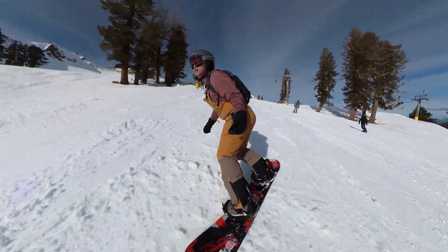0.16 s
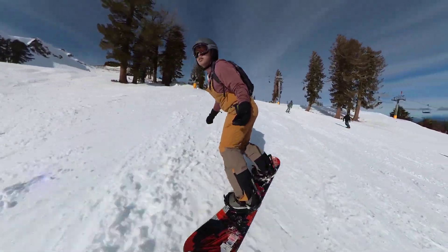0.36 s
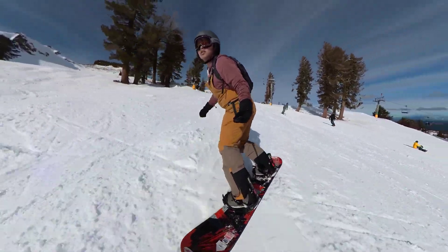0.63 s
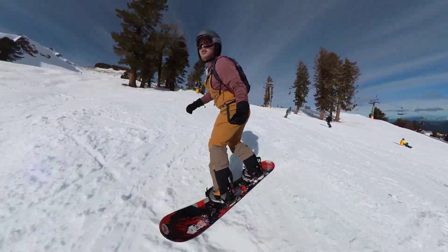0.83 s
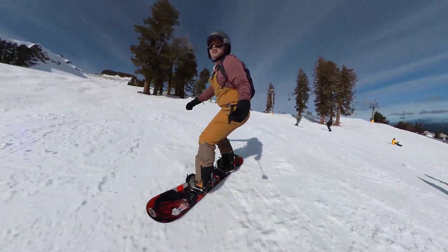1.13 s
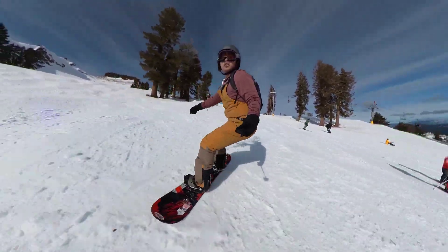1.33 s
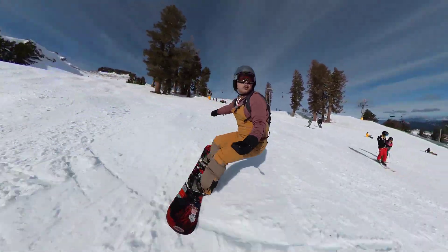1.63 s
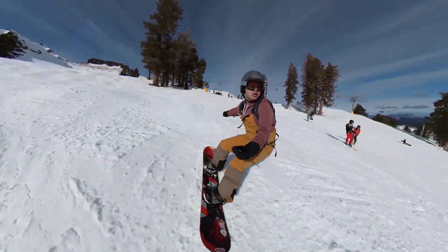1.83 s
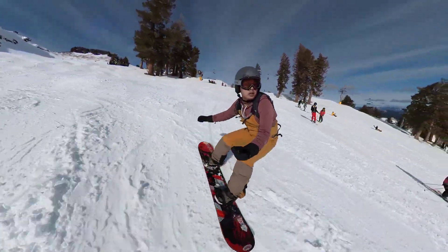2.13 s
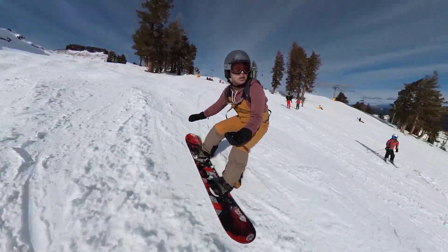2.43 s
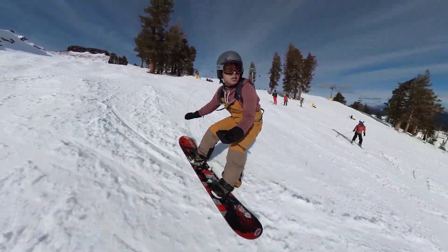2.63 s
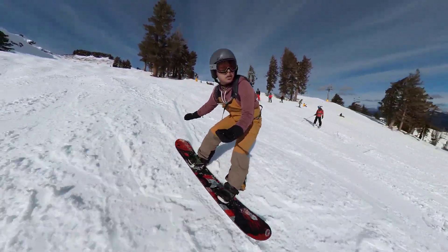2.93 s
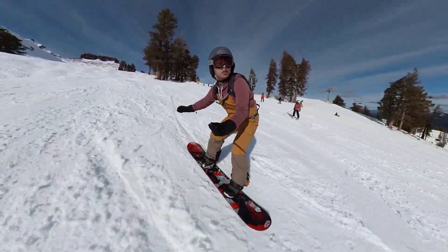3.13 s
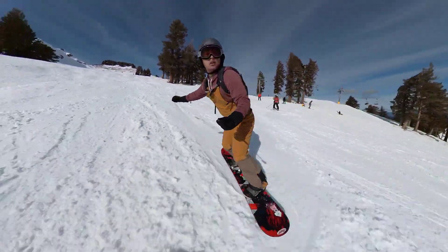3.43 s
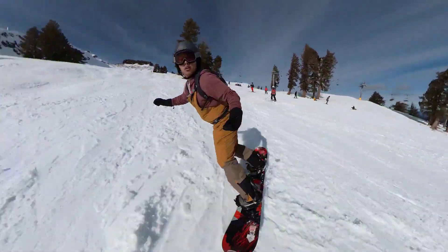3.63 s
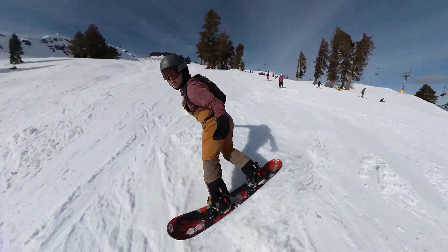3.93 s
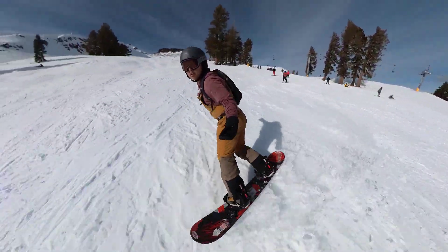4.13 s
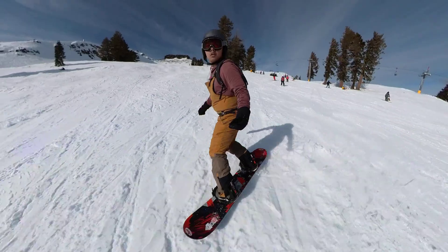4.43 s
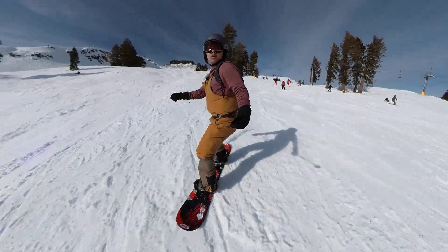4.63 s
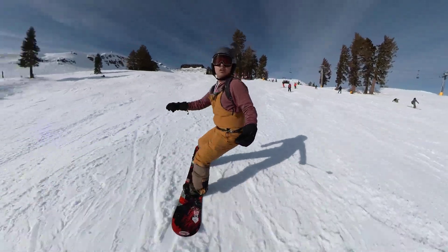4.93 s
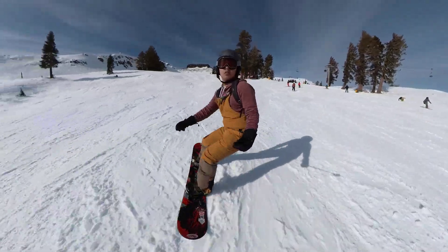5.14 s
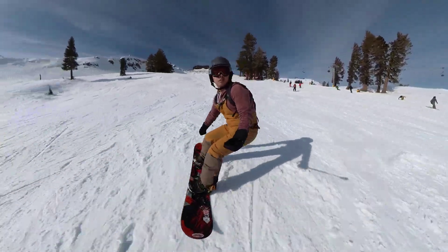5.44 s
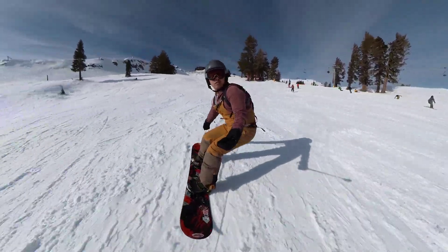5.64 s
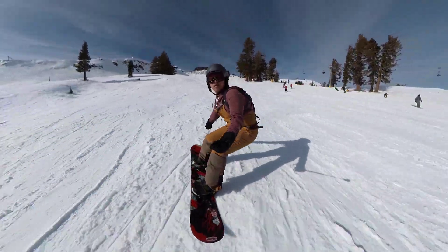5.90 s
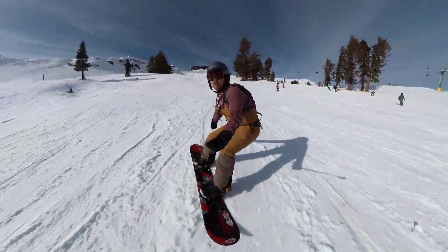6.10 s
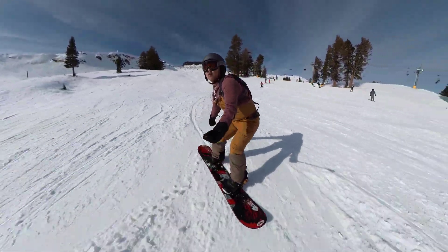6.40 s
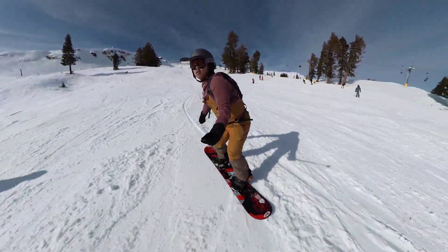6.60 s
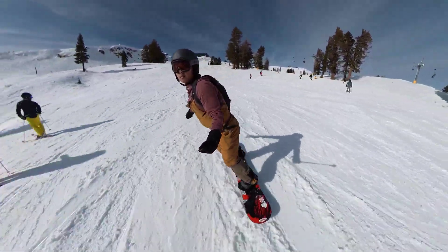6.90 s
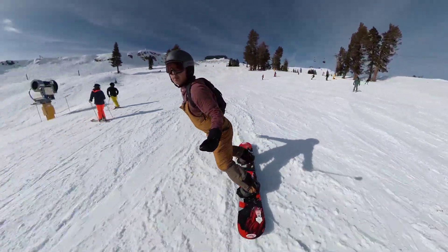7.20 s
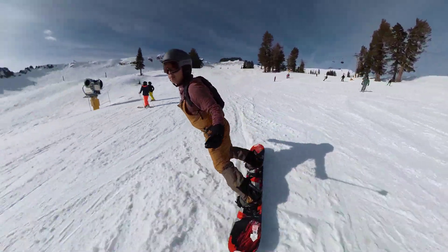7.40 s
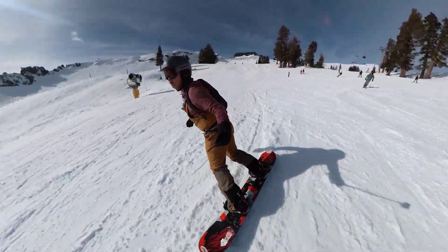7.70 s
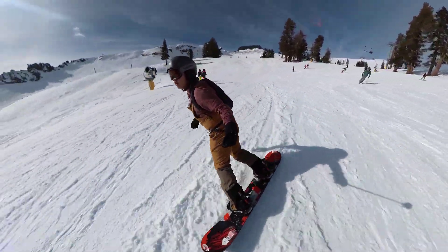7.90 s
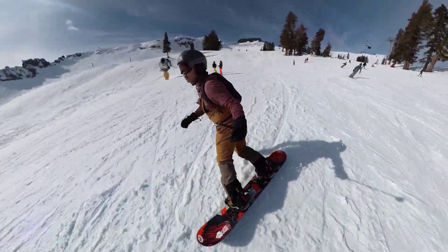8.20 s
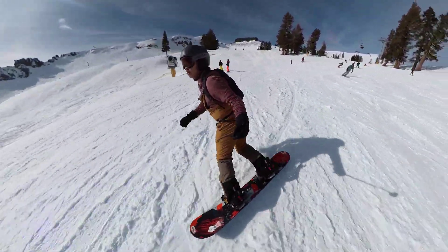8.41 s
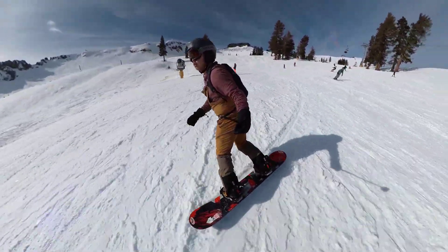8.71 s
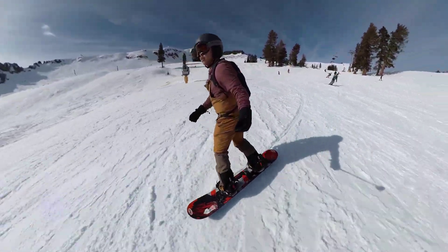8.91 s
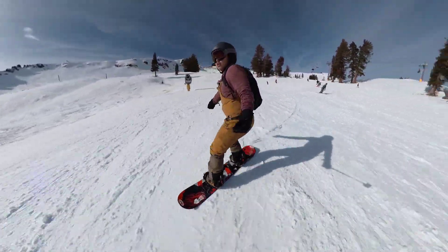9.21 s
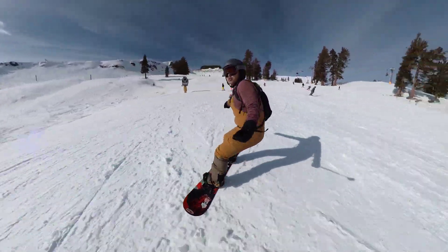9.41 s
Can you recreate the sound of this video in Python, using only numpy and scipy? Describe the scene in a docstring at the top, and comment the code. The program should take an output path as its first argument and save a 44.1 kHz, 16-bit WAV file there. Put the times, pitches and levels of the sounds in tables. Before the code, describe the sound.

A snowboard carves down a packed slope, heard from a microphone on a pole held by the rider. The edge scrapes and throws a bright hiss of spray that swells with each turn, over the low drumming of the board. After about two seconds, rough wind buffets the microphone, easing past the middle and returning in a later burst. Lumps of snow knock lightly, and a binding ticks near the end.

```python
"""A snowboard carves down packed snow, heard from a camera on a pole held by the rider.
The steel edge crushes grains and throws hissing spray with each turn; the board drums over ridges.
Loose lumps knock on the board, and a binding ticks near the end.
When the pole swings into the airstream, eddies buffet the microphone in rough gusts.
At times the camera switches to a sheltered microphone, where the hiss rings higher."""
import sys
import numpy as np
from scipy import signal
from scipy.fft import rfft, irfft, next_fast_len
from scipy.io import wavfile
from scipy.ndimage import map_coordinates

SR = 44100
rng = np.random.default_rng(int(sys.argv[2]) if len(sys.argv) > 2 else 0)


def dump(signal):
    """Clip the signal to [-1, 1] and save it as 16-bit WAV at the path in sys.argv[1]."""
    limited = np.clip(np.atleast_2d(signal).T, -1, 1)
    pcm = np.round(limited * 32767).astype(np.int16)
    wavfile.write(sys.argv[1], SR, pcm)


N = 421155
T = np.arange(N) / SR

# Turns load the edge. Each row: time of full load, hold, rise and release in seconds,
# scrape and hiss in dB, spray over hiss in dB.
TURNS = [(0, 0.35, .1, .1, -49, -32.5, -12), (0.348, 0.68, .012, 0.74, -47.5, -32, -4.5),
         (1.743, 0.58, 1, 0.51, -49, -52, -0.5), (2.463, 0.6, 0.12, 0.11, -53, -45, -4),
         (3.253, 1.5, 0.52, 0.57, -60.5, -47, -4), (3.986, 0.48, 0.015, 0.63, -44.5, -35.5, -4.5),
         (5.004, 0.42, 0.37, 0.39, -52.5, -41, -7), (5.698, 0.5, 1, 0.56, -46, -43.5, 0.5),
         (7.605, 1.25, 0.63, 0.43, -48, -41, -5), (9.204, 0.41, 1, .3, -63.5, -48.5, -5.5)]
# Short skids. Each row: time of full bite, hold, rise and release in seconds, scrape and hiss in dB.
SKIDS = [(0, 0.043, 0.015, .04, -41, -37), (0.357, 0.054, .012, 0.072, -47, -48),
         (0.462, 0.1, .03, .15, -44.5, -43), (0.603, 0.15, 0.095, .03, -48, -37.5),
         (0.81, 0.11, .04, 0.15, -43, -43), (1.245, 0.037, .03, .06, -53, -37.5),
         (1.439, 0.076, .015, 0.27, -53, -33.5), (1.695, .04, .015, .05, -47, -54),
         (1.755, 0.12, .03, 0.051, -44.5, -34.5), (2.107, 0.077, 0.055, 0.069, -45, -55),
         (2.578, 0.074, .025, .1, -46.5, -59), (3.088, 0.067, 0.026, .025, -47, -52),
         (3.8, 0.087, .05, 0.12, -48.5, -32), (4.041, 0.07, .03, .08, -44, -30),
         (4.333, .11, .05, .12, -51, -38.5), (4.799, 0.024, .01, .02, -45.5, -46),
         (5.032, 0.036, .02, 0.034, -48, -47), (5.106, 0.03, 0.016, 0.037, -50, -38.5),
         (5.225, 0.033, .02, .03, -47, -37), (5.349, .025, 0.022, 0.035, -45.5, -36.5),
         (5.56, 0.054, .05, .08, -47.5, -46), (5.985, 0.029, .02, 0.067, -45, -42),
         (6.3, 0.22, .1, 0.65, -55, -58), (6.945, 0.44, 0.042, .06, -56, -68),
         (7.552, 0.052, 0.011, .05, -48, -39.5), (7.789, 0.037, 0.043, .06, -45.5, -35.5),
         (7.895, 0.036, .03, .02, -52, -41), (8.075, 0.022, .02, 0.035, -47, -33.5),
         (8.398, .03, .03, .05, -45.5, -50), (9.2, .03, .02, .03, -56, -39)]
# Puffs of fine powder. Each row: centre and half length in seconds, level in dB.
POWDER_PUFFS = [(0.26, 0.14, -36.5), (.55, 0.088, -39), (1.05, 0.072, -38), (1.22, 0.077, -41),
                (2.0, 0.078, -44), (3.77, 0.06, -41), (4.1, .04, -39), (4.42, 0.073, -44),
                (5.135, 0.022, -41), (5.245, .02, -39), (5.38, .06, -44), (6.4, 0.11, -43),
                (6.8, 0.25, -52.5), (7.222, 0.12, -47), (8.742, .16, -43)]
# Sheets of spray. Each row: centre and half length in seconds, level in dB, pitch in Hz,
# glide in Hz per second.
SWISHES = [(0.606, 0.22, -31.5, 11650, -1500), (1.478, 0.04, -36.5, 10340, -7000),
           (1.819, 0.081, -37, 11300, -3000), (2.777, 0.023, -43, 12400, -5000),
           (2.882, 0.02, -47, 12400, -5000), (3.726, 0.034, -40, 13600, -6000),
           (3.839, 0.063, -34, 12700, -13000), (4.0, 0.01, -34.5, 9870, 5000),
           (4.187, 0.065, -33, 10880, 5000), (5.921, 0.24, -39.5, 11750, -1000),
           (7.459, 0.031, -45.5, 9530, 2000)]
# Stereo width of the spray. Each row: time in seconds, ratio of side to mid.
SPRAY_WIDTH = [(2.3, 0.56), (2.45, 0.17), (3.85, 0.23), (4.1, 0.2)]
# Weight taken off the board. Each row: centre and half length in seconds, dip in dB.
UNWEIGHTINGS = [(2, .04, -3), (4.74, 0.059, -5.5), (6.674, 0.19, -4)]
# Sheltered microphone in use. Each row: start and end in seconds.
SHELTERED_SPANS = [(.06, 0.353), (2.38, 3.975), (7.94, 9.7)]
# Spectra of the snow under the edge. Each row: frequency in Hz, gain in dB.
CRUNCH_SPECTRUM = [(600, -15), (1100, -3.5), (1500, 0.5), (2000, 3), (2900, 3), (3500, 1), (4500, -5.5),
                   (8000, -29)]
SCRAPE_SPECTRUM = [(1500, -30), (2900, -21.5), (3700, -3), (4500, -1.5), (5600, -0.5), (7300, -4),
                   (8600, -4), (10500, -1), (15000, -16)]
SIZZLE_SPECTRUM = [(6000, -27), (8000, -13.5), (9200, -6.5), (10000, -3.5), (10370, 0), (10900, -3),
                   (11500, -3), (12500, -26), (14500, -30)]
SPRAY_SPECTRUM = [(5000, -35), (6300, -10), (7300, -9), (8500, -13), (9900, -15), (11000, -1.5), (12000, 1),
                  (12800, 3), (13600, 0), (14600, -14), (16000, -31)]
POWDER_SPECTRUM = [(11500, -60), (13200, 2), (14000, -4), (15000, 3), (16000, -5)]
# Spectra of the board's vibration. Each row: frequency in Hz, gain in dB.
FLEX_SPECTRUM = [(25, -48), (45, -35), (70, -10.5), (95, -1), (112, -1.5), (135, -1), (165, -4), (220, -14),
                 (400, -18), (1000, -66)]
DECK_OPEN_SPECTRUM = [(110, -33), (210, -9.5), (310, -2.5), (410, -6.5), (560, 0), (680, -3.5), (850, -5),
                      (1100, -5), (1400, -19), (1600, -12.5), (4000, -22)]
DECK_SHELTERED_SPECTRUM = [(110, -37), (210, -5), (310, 5), (410, -2.5), (540, 3.5), (660, -0.5), (850, -5),
                           (1100, -7.5), (1600, -11), (4000, -25.5)]
HUM_SPECTRUM = [(60, -56), (95, -8), (109, 4), (116, 13), (130, -41), (200, -78)]
HOLLOW_SPECTRUM = [(650, -21), (950, -5), (1150, -4.5), (1400, -6), (1560, -21), (2500, -43)]
# The board's flexing drone, hum and hollow ring. Each row: time in seconds, level in dB.
FLEX_LEVELS = [(0, -53), (.38, -57.5), (.85, -57), (1.0, -65), (1.42, -60), (1.56, -52.5), (2.0, -56.5),
               (4.03, -44.5), (4.55, -44.5), (4.8, -55), (5.25, -51), (5.47, -39), (5.8, -55.5),
               (6.1, -48.5), (6.45, -55.5), (7.0, -53), (7.7, -48.5), (9.4, -41)]
HUM_LEVELS = [(7.9, -71), (8.1, -51), (8.55, -50), (8.85, -41), (9.17, -45), (9.3, -46), (9.55, -71)]
HOLLOW_LEVELS = [(0, -77), (.9, -52), (1.45, -58), (1.8, -50.5), (2.05, -69), (2.42, -51), (2.6, -56),
                 (2.8, -51), (3.05, -82), (3.3, -77), (4.8, -60), (6.0, -56.5), (6.6, -65), (9.55, -64)]
# Gusts. Each row: time of full strength, hold and rise in seconds, large-eddy level in dB, # tilt in dB per
# step down in eddy size. The brief row at 1.5 s is a dull knock on the board, voiced by the same eddy noise.
GUSTS = [(0, 0.35, .05, -50, -8), (1.5, 0.0071, 0.0062, -45, -6), (2.195, .1, 0.17, -47.5, -0.5),
         (2.296, 0.055, 0.11, -40, 1.5), (2.41, 0.17, 0.1, -34.5, -16), (2.64, 0.32, 0.08, -30.5, -14),
         (2.986, 0.13, 0.046, -38, -22), (3.13, 0.032, 0.043, -31, -11), (3.196, 0.54, 0.011, -27.5, -12.5),
         (3.785, 0.15, 0.025, -29.5, -14.5), (3.922, 0.018, 0.02, -33.5, -2.5),
         (4.017, 0.032, .02, -44, -12), (4.26, 0.09, 0.091, -37, -8), (4.295, 0.11, 0.02, -33.5, -13),
         (4.393, 0.03, 0.055, -42, -14), (5.118, 0.17, 0.045, -40, -14.5), (6.616, 0.29, 0.076, -48.5, -40),
         (6.921, 0.34, 0.079, -40.5, -19), (7.19, 0.059, 0.058, -41, -6.5),
         (7.272, 0.08, 0.065, -35.5, -10), (7.376, 0.14, .02, -32.5, -8.5), (7.527, 0.045, .03, -37.5, -6),
         (7.871, 0.037, 0.084, -39, -1)]
# Spectra of air at the microphone port. Each row: frequency in Hz, gain in dB.
LARGE_EDDY_SPECTRUM = [(22, -36), (40, -58), (62, -9), (100, 1.5), (140, 1), (200, -4), (270, -12),
                       (420, -42), (900, -32), (2000, -90)]
MIDDLE_EDDY_SPECTRUM = [(90, -31), (200, -1.5), (290, 2), (480, -2), (700, -8.5), (950, -15), (1500, -29),
                        (4000, -79)]
SMALL_EDDY_SPECTRUM = [(350, -4), (700, 2), (950, 2.5), (1300, -1.5), (1700, -9.5), (2400, -17.5),
                       (3500, -28), (6000, -43), (12000, -65)]
WHOOSH_SPECTRUM = [(250, -32), (450, -3.5), (750, 1), (1000, -1.5), (1300, -8), (1900, -17), (3000, -31.5),
                   (6000, -51)]
# Lumps and ice hitting the board. Each row: start in seconds, relative level in dB, pitch in Hz.
LUMPS = [(1.271, -40.5, 890), (1.502, -41, 427), (1.702, -37, 1080), (4.909, -42, 7050),
         (5.25, -37.5, 3220), (9.215, -42.5, 1320)]
# Slaps of air. Each row: start in seconds, peak before limiting in dB, weight of torn small eddies.
SLAPS = [(2.274, -19.5, 1), (2.309, -15.5, 1), (2.351, -19, 1), (2.368, -18, 0.97), (2.44, -19, .05),
         (2.52, -19, 0.14), (2.624, -27, .15), (2.639, -21.5, 0.15), (2.664, -25, .1), (2.675, -28, .1),
         (2.698, -24, .1), (2.723, -28, .1), (2.775, -18, 0.34), (2.8, -18.5, 0.15), (2.842, -18.5, 0.19),
         (2.866, -25, 0.089), (2.897, -20, 0.18), (2.949, -26.5, .15), (3.094, -23, .1),
         (3.128, -18.5, 0.12), (3.145, -23, .1), (3.197, -23.5, 0.3), (3.23, -26, .15), (3.246, -28, 0.14),
         (3.277, -26, .2), (3.286, -29, 0.14), (3.32, -21.5, 0.38), (3.346, -18.5, 0.55),
         (3.408, -19, 0.23), (3.467, -26, .15), (3.49, -21, 0.24), (3.509, -19, 0.18), (3.584, -26, .15),
         (3.605, -14.5, 0.25), (3.63, -18, 0.17), (3.645, -16, 0.25), (3.716, -19, 0.32), (3.779, -24, .2),
         (3.822, -23.5, .2), (3.862, -28, .2), (3.884, -20, .15), (4.232, -32, .3), (4.259, -19, 0.21),
         (4.293, -20, .15), (4.34, -30, 0.35), (4.363, -26.5, 0.18), (4.454, -29, 0.069),
         (4.473, -28.5, .05), (5.094, -32, .05), (5.109, -35, .02), (5.13, -39, .1), (5.141, -30.5, .15),
         (5.154, -33, .4), (5.164, -23.5, 0.1), (5.205, -27, .15), (5.219, -31, .3), (5.251, -23, 0.23),
         (7.237, -23.5, 0.4), (7.271, -23, 0.97), (7.284, -18.5, 1), (7.297, -30, .6), (7.314, -23, .5),
         (7.328, -29, .8), (7.358, -23, 1), (7.374, -17, 0.94), (7.396, -19, 0.99), (7.42, -24, 1),
         (7.436, -25, .2), (7.451, -23, 0.99), (7.476, -20, 0.45), (7.508, -18.5, .95), (7.522, -23, .6),
         (7.576, -33, 0.66), (9.086, -34.5, 0.97), (9.342, -29, .08), (9.538, -30.5, 0.94)]
# Head-on gusts. Each row: time of full strength, hold and rise in seconds, level in dB,
# nominal pitch in Hz, climb in octaves per second.
WHOOSHES = [(2.301, 0.0098, 0.12, -37, 940, 2), (2.327, 0.044, 0.065, -38, 1660, 1),
            (3.945, 0.025, 0.055, -26.5, 1149, 7), (7.286, .008, 0.032, -42, 1505, -0.5),
            (7.373, .028, .05, -41.5, 2200, 0), (7.865, 0.062, 0.1, -31, 729.6, 5.5)]
# Binding ticks. Each row: start in seconds, peak in dB.
BINDING_TICKS = [(9.477, -38), (9.482, -27)]
# Binding modes. Each row: frequency in Hz, gain in dB, time to fall 60 dB in seconds.
BINDING_MODES = [(1940, -9, .015), (2600, 3, 0.0088), (3320, -4, 0.022), (4000, -5, .02), (4530, 4, 0.015)]


def amp(db):
    """Decibels to gain."""
    return 10 ** (np.asarray(db) / 20)


def unit(x):
    """Scale to rms 1."""
    return x / np.sqrt(np.mean(x ** 2))


def power_sum(gains):
    """Unrelated sounds add in power."""
    return np.sqrt(sum(g ** 2 for g in gains))


def curve(points):
    """Straight lines through (seconds, value) points."""
    return np.interp(T, *np.transpose(points))


def swell(full_s, hold_s, rise_s, release_s):
    """Rise, hold, release; rise and release are times for a tenfold change."""
    return 10 ** -(np.maximum(full_s - T, 0) / rise_s + np.maximum(T - full_s - hold_s, 0) / release_s)


def bell(centre_s, half_s):
    """Gaussian swell."""
    return np.exp(-.5 * np.minimum(((T - centre_s) / half_s) ** 2, 200))


def burst(start_s, rise_s, decay_s):
    """A blow's sample span, age and envelope of peak 1."""
    first = int(start_s * SR)
    span = slice(first, min(N, first + SR // 10))
    age_s = T[span] - T[first]
    envelope = (1 - np.exp(-age_s / rise_s)) * np.exp(-age_s / decay_s)
    return span, age_s, envelope / envelope.max()


def walk(rate_hz):
    """Smooth random drift, standard deviation 1."""
    knots = rng.standard_normal(N // 16)
    steps = np.arange(0, T[-1] * rate_hz + 1, 1 / 4)
    drift = np.interp(T * rate_hz, steps, map_coordinates(knots, [steps], order=2, mode="wrap"))
    return drift / drift.std()


def colour(x, spectrum):
    """Filter by (Hz, dB) points."""
    hz, db = np.transpose(spectrum)
    size = next_fast_len(N + 4096, real=True)
    bins_hz = np.maximum(np.fft.rfftfreq(size, 1 / SR), 1)
    gain = amp(np.interp(np.log(bins_hz), np.log(hz), db))
    return irfft(rfft(x, size) * gain, size)[:N]


def noise(spectrum, drive=1):
    """Noise modulated by drive, then coloured; rms 1."""
    return unit(colour(rng.standard_normal(N) * drive, spectrum))


def butter(x, hz, kind, order):
    """Butterworth filter."""
    return signal.sosfilt(signal.butter(order, hz, kind, fs=SR, output="sos"), x)


def sheltered(fade_s=0.02):
    """Share of the sheltered microphone, 0 to 1."""
    return sum(np.clip(.5 + np.minimum(T - start_s, end_s - T) / fade_s, 0, 1)
               for start_s, end_s in SHELTERED_SPANS)


def mic_gain(open_db, sheltered_db):
    """A layer's gain at the microphone in use."""
    return amp(open_db + (sheltered_db - open_db) * sheltered())


def load():
    """Gain of the board's weight on the snow; dips between turns."""
    return amp(sum(db * bell(centre_s, half_s) for centre_s, half_s, db in UNWEIGHTINGS))


def carving():
    """Scrape, hiss and spray gains: the flat base gliding, plus turns and skids."""
    gains = [amp([[-57.5], [-55], [-71]])]  # steady glide
    for *timing_s, scrape_db, hiss_db, spray_db in TURNS:
        gains.append(amp([[scrape_db], [hiss_db], [hiss_db + spray_db]]) * swell(*timing_s))
    for *timing_s, scrape_db, hiss_db in SKIDS:
        gains.append(amp([[scrape_db], [hiss_db], [hiss_db - 14]]) * swell(*timing_s))
    return power_sum(gains)


def grains(spectrum, chatter, grain_db, rate_hz, width):
    """Tiny snow fractures ride on the edge's chatter; mid and side."""
    fractures = chatter * amp(grain_db * walk(rate_hz))
    return np.array([noise(spectrum, fractures), width * noise(spectrum, fractures)])


def band_flicker(x, patch_hz=330, patch_s=.024, depth_db=2.2):
    """Narrow bands of the hiss swell and fade at random."""
    hz, times_s, bands = signal.stft(x, SR, nperseg=512)
    knots = rng.standard_normal((SR // 100, N // 400))
    grid = np.meshgrid(hz / patch_hz, times_s / patch_s, indexing="ij")
    patches = unit(map_coordinates(knots, grid, order=2, mode="wrap"))
    return signal.istft(bands * unit(amp(depth_db * patches)), SR, nperseg=512)[1][:, :N]


def edge(scrape_gain, hiss_gain, spray_gain):
    """The edge chatters over ridges, breaks crust, scrapes, crushes grains and throws spray; stereo."""
    width = curve(SPRAY_WIDTH)
    puffs = [amp(db) * bell(centre_s, half_s) for centre_s, half_s, db in POWDER_PUFFS]
    chatter = amp(0.85 * walk(24) + 0.71 * walk(110) + 0.45 * walk(1300))
    crunch = grains(CRUNCH_SPECTRUM, chatter, grain_db=0.04, rate_hz=280, width=0.016)
    scrape = grains(SCRAPE_SPECTRUM, chatter, grain_db=0.5, rate_hz=720, width=0.76)
    sizzle = grains(SIZZLE_SPECTRUM, chatter, grain_db=-0.8, rate_hz=340, width=0.18)
    spray = grains(SPRAY_SPECTRUM, chatter, grain_db=0, rate_hz=150, width=width)
    powder = grains(POWDER_SPECTRUM, chatter, grain_db=1, rate_hz=370, width=2.1 * width)
    crunch *= scrape_gain * load() * mic_gain(open_db=-4, sheltered_db=-5.5)
    scrape *= scrape_gain * mic_gain(0.24, -2.5)
    sizzle *= hiss_gain * mic_gain(-3, -13)
    spray *= spray_gain * mic_gain(-0.7, 4)
    powder *= power_sum([spray_gain * mic_gain(-3, -2)] + puffs)
    mid, side = band_flicker(crunch + scrape + sizzle + spray + powder + swishes(chatter))
    mid = butter(mid, 70, "highpass", order=2)
    side = butter(side, 3000, "highpass", order=14)  # only the treble spreads
    return np.array([mid + side, mid - side])


def board(scrape_gain, pivot_db=-49, growth_db_per_db=0.64):
    """Bumps flex the board; the deck rattles more as the edge scrapes harder; a hum joins late."""
    flex_gain, hum_gain = amp(curve(FLEX_LEVELS)), amp(curve(HUM_LEVELS))
    bumps = walk(35)
    hum = noise(HUM_SPECTRUM) * hum_gain
    rattle_gain = amp(pivot_db) * (scrape_gain / amp(pivot_db)) ** growth_db_per_db
    share, jolts = sheltered(), amp(bumps)
    deck_open = amp(-3.5) * noise(DECK_OPEN_SPECTRUM, jolts)
    deck_sheltered = amp(-0.5) * noise(DECK_SHELTERED_SPECTRUM, jolts)
    deck = rattle_gain * ((1 - share) * deck_open + share * deck_sheltered)
    # the hum draws its energy from the drone
    drone_gain = np.sqrt(np.maximum(flex_gain ** 2 - hum_gain ** 2, 0.46 * flex_gain ** 2))
    drone = noise(FLEX_SPECTRUM, amp(2 * bumps + 1.7 * walk(9))) * drone_gain
    return drone + hum + deck * load()


def hollow_ring():
    """The sliding board rings in one broad band."""
    return noise(HOLLOW_SPECTRUM) * amp(curve(HOLLOW_LEVELS)) * load()


def gusts(release_s=0.042, middle_db=5.5):
    """Gains of large, middle and small eddies as gusts build, hold and break off."""
    return power_sum(amp([[db], [db + tilt_db + middle_db], [db + 2 * tilt_db]])
                     * swell(*timing_s, release_s) for *timing_s, db, tilt_db in GUSTS)


def vortices(rate_hz=140, jitter=.55):
    """Small vortices cross the port at uneven intervals, each a pressure spike; rms 1."""
    gaps_s = np.exp(jitter * rng.standard_normal(N // 100)) / rate_hz
    arrivals = (np.cumsum(gaps_s) * SR).astype(int)
    return unit(np.bincount(arrivals[arrivals < N], minlength=N))


def eddies(spectrum, spikes, drive, spike_share):
    """Vortex spikes blended with random churning; rms 1."""
    flow = np.sqrt(spike_share) * spikes + np.sqrt(1 - spike_share) * rng.standard_normal(N)
    return unit(colour(flow * drive, spectrum))


def wind(ceiling=0.12):
    """Turbulence arrives in puffs; the microphone rounds off the strongest swings."""
    large_gain, middle_gain, small_gain = gusts()
    puffs = np.tanh(.35 * walk(30) + .6 * walk(120))
    spikes = vortices()
    large = amp(2.5) * noise(LARGE_EDDY_SPECTRUM, amp(7.2 * puffs))
    middle = amp(1.34) * eddies(MIDDLE_EDDY_SPECTRUM, spikes, amp(5.5 * puffs), spike_share=0.6)
    small = amp(5) * eddies(SMALL_EDDY_SPECTRUM, spikes, amp(8.5 * puffs), spike_share=0.36)
    pressure = large_gain * large + middle_gain * middle + small_gain * small + slaps() + whooshes()
    return pressure / (1 + (pressure / ceiling) ** 4) ** (1 / 4)


def swishes(chatter, half_band_hz=1320, width=0.21):
    """Each sheet of spray hisses in one gliding band; mid and side."""
    white = rng.standard_normal((2, N)) + 1j * rng.standard_normal((2, N))
    band = butter(white, half_band_hz, "lowpass", order=2)
    carrier = np.zeros(N, complex)
    for centre_s, half_s, db, hz, hz_per_s in SWISHES:
        near = np.abs(T - centre_s) < 4 * half_s
        offset_s = T[near] - centre_s
        cycles = (hz + hz_per_s * offset_s / 2) * offset_s
        carrier[near] += amp(db) * bell(centre_s, half_s)[near] * np.exp(2j * np.pi * cycles)
    hiss = (band * carrier).real / band.real.std()
    fractures = unit(chatter * amp(walk(460)))
    return hiss * fractures * np.array([[1], [width]])


def lumps():
    """Hard lumps hit the board with short, gritty knocks."""
    out = np.zeros(N)
    for start_s, db, hz in LUMPS:
        span, _, envelope = burst(start_s, rise_s=.001, decay_s=0.0056)
        grit = noise([(hz / 3, -22), (hz, 0), (hz * 2, -13), (hz * 8, -35)])
        out[span] += amp(db - 3.5) * envelope * grit[span]
    return out


def slaps(swing_hz=165, front_s=.0037):
    """A big vortex hits the port: a short, torn puff, then a damped pressure swing."""
    out = np.zeros(N)
    middle, small = noise(MIDDLE_EDDY_SPECTRUM), noise(SMALL_EDDY_SPECTRUM)
    for start_s, db, torn in SLAPS:
        span, age_s, envelope = burst(start_s, rise_s=0.0024, decay_s=0.0078)
        puff = (age_s / front_s) ** 2 * np.exp(-(age_s / front_s) ** 2)
        front = amp(-6.5) * unit(middle[span] * puff) + torn * amp(-6) * unit(small[span] * puff)
        swing = amp(-6) * unit(envelope * np.sin(2 * np.pi * swing_hz * age_s))
        blow = front + swing
        out[span] += amp(db) * blow / np.abs(blow).max()
    return out


def whooshes(reference_hz=1000, release_s=0.0097):
    """Air straight across the port rasps in one band that follows its speed, then breaks off."""
    flutter = amp(np.tanh(1.5 * walk(170)))
    rasp = noise(WHOOSH_SPECTRUM, flutter)
    out = np.zeros(N)
    for *timing_s, db, hz, octaves_per_s in WHOOSHES:
        speed = hz / reference_hz * 2 ** np.clip(octaves_per_s * (T - timing_s[0]), -1, 1 / 2)
        gliding = map_coordinates(rasp, [np.cumsum(speed) % (N - 1)], order=1)
        out += amp(db) * swell(*timing_s, release_s) * gliding
    return out


def binding():
    """A binding ticks as the weight shifts to the other edge."""
    out = np.zeros(N)
    for start_s, peak_db in BINDING_TICKS:
        age_s = np.maximum(T - start_s, 0)
        ring = sum(amp(db) * np.sin(2 * np.pi * hz * age_s) * amp(-60 * age_s / t60_s)
                   for hz, db, t60_s in BINDING_MODES)
        out += amp(peak_db) * ring / (np.abs(ring).max() + 1e-9)
    return out


def scene():
    """Snow hiss spreads wide; board and wind sit in the middle."""
    scrape_gain, hiss_gain, spray_gain = carving()
    snow = edge(scrape_gain, hiss_gain, spray_gain)
    return snow + board(scrape_gain) + hollow_ring() + lumps() + wind() + binding()


def record(dry):
    """The camera cuts the top steeply."""
    top_hz = 15850
    return signal.sosfilt(signal.ellip(12, .1, 80, top_hz, fs=SR, output="sos"), dry)


dry = scene()
out = record(dry)
dump(out)
```